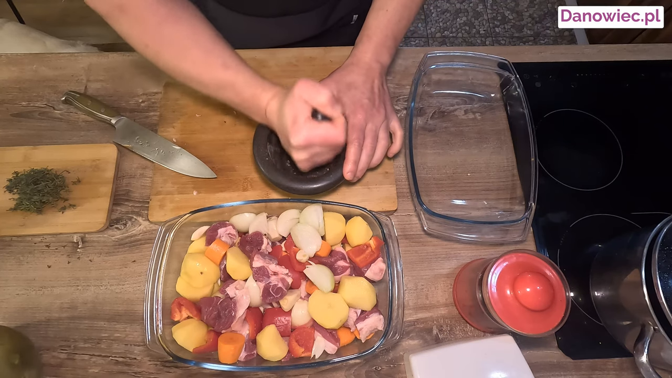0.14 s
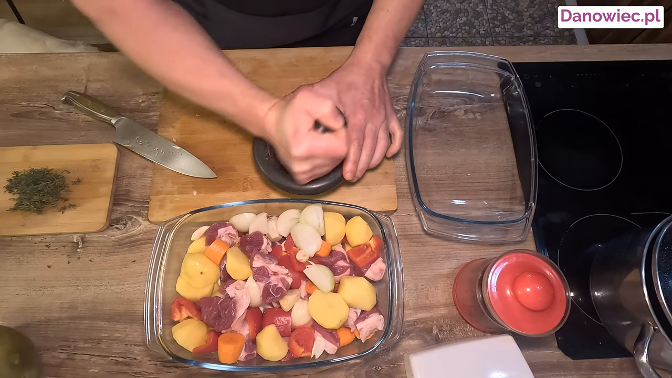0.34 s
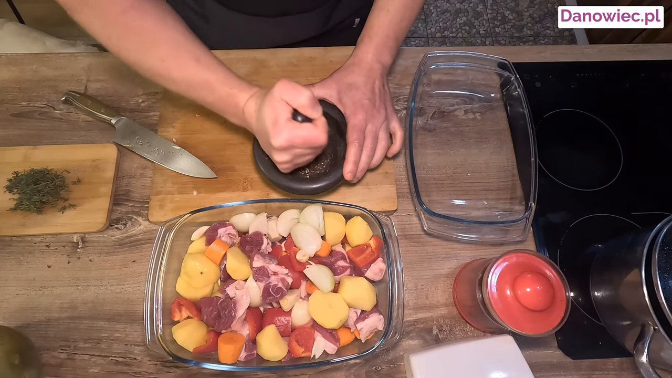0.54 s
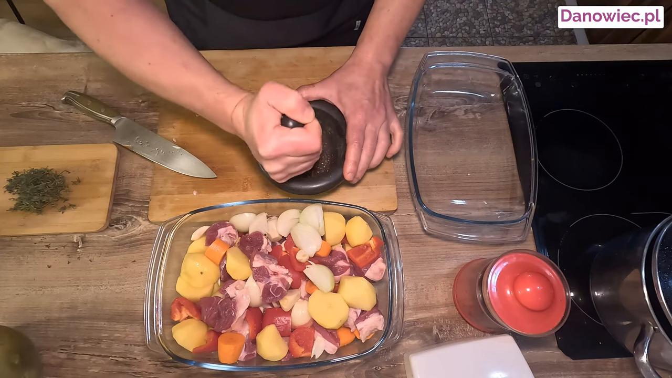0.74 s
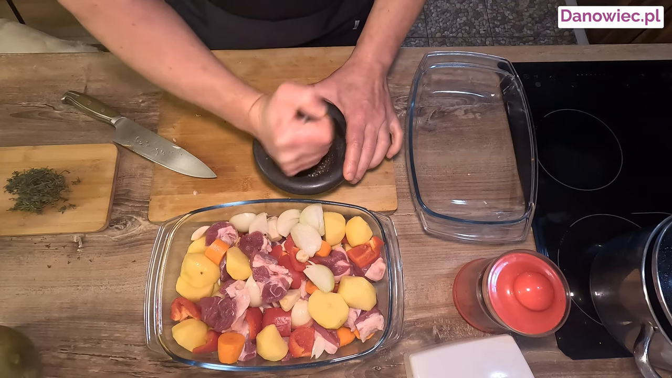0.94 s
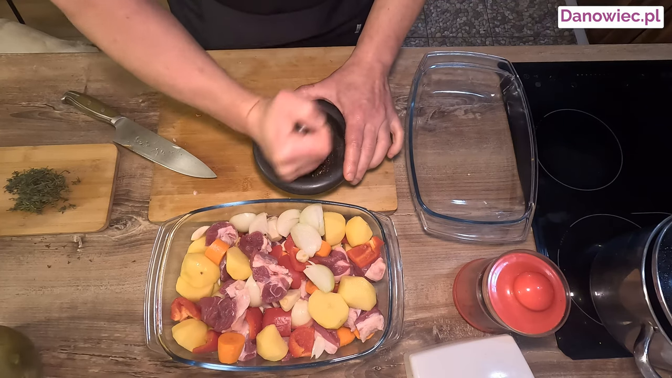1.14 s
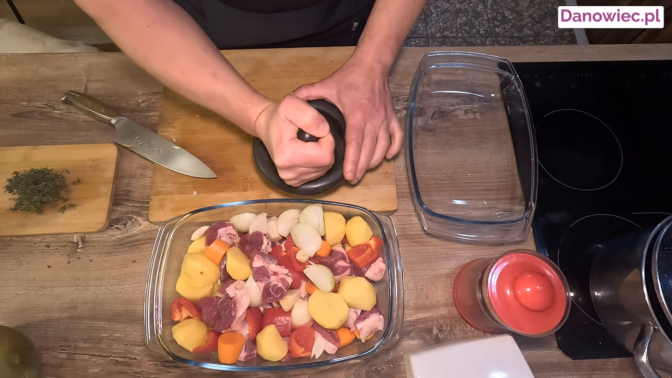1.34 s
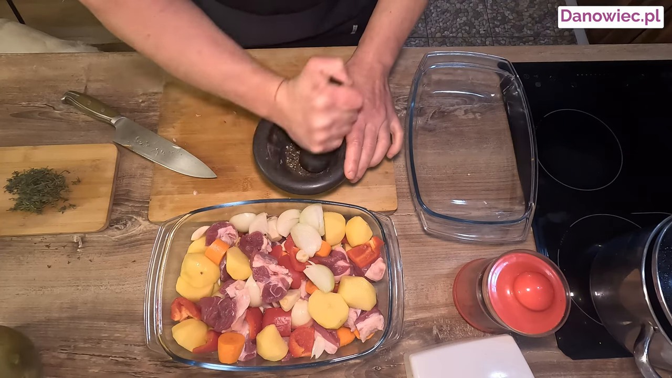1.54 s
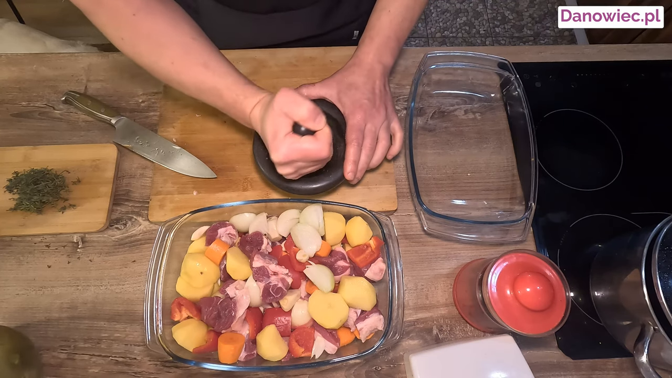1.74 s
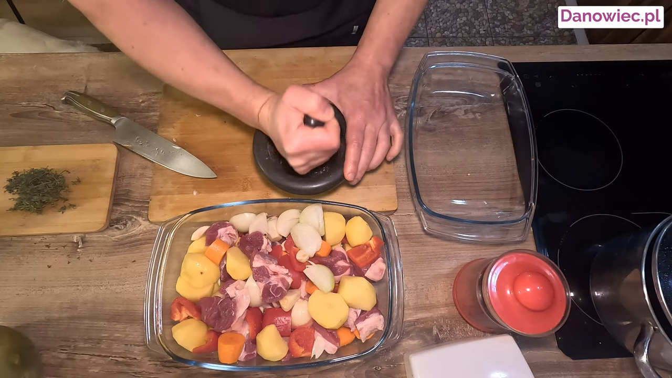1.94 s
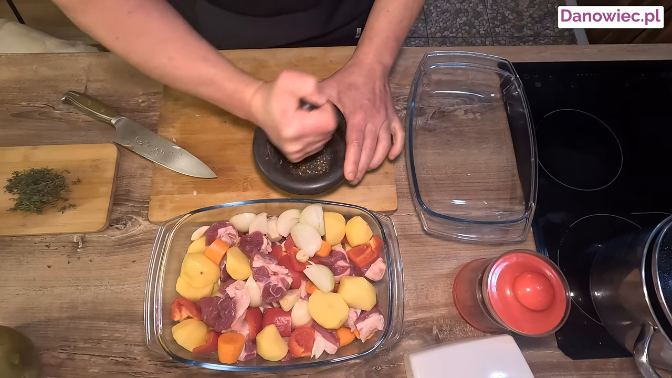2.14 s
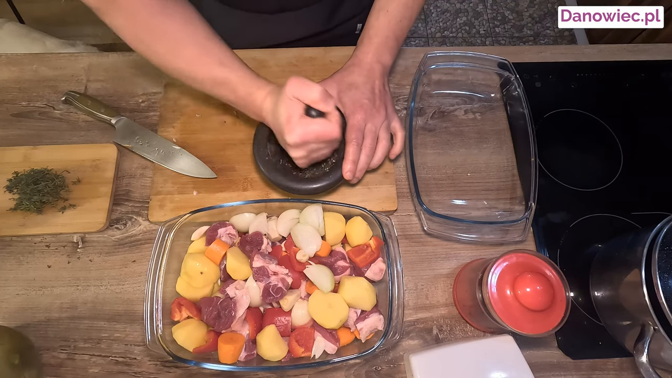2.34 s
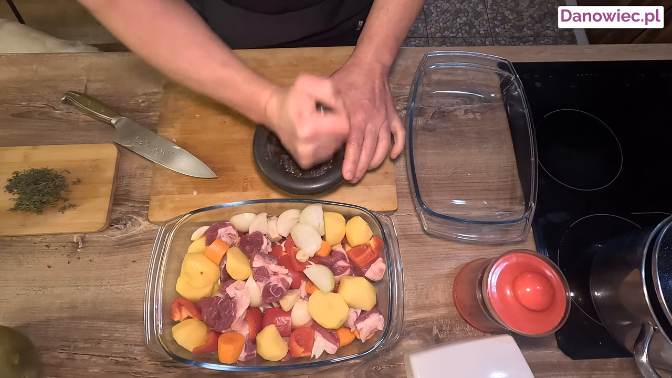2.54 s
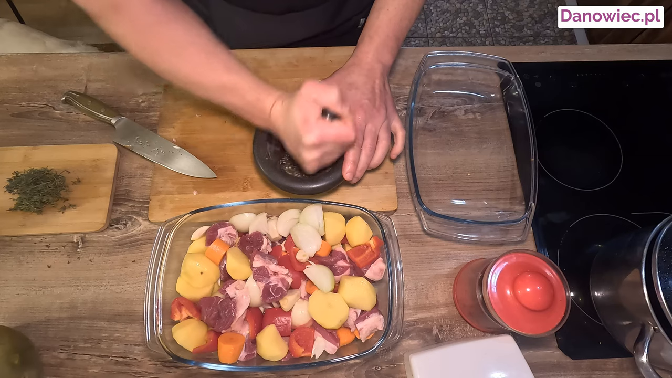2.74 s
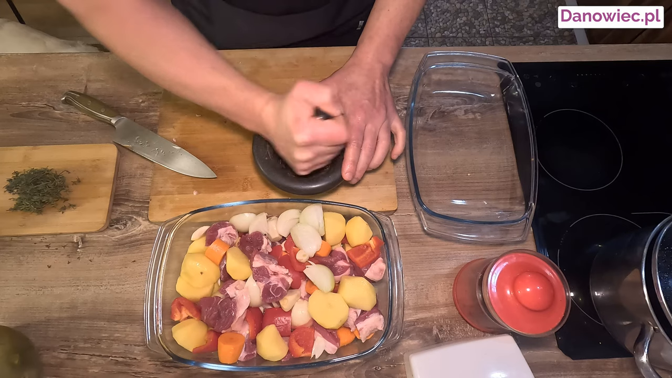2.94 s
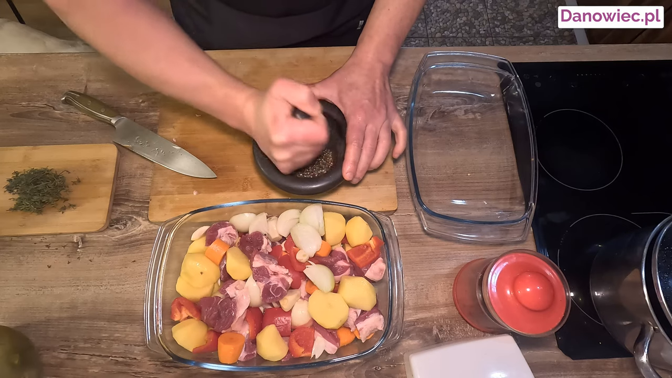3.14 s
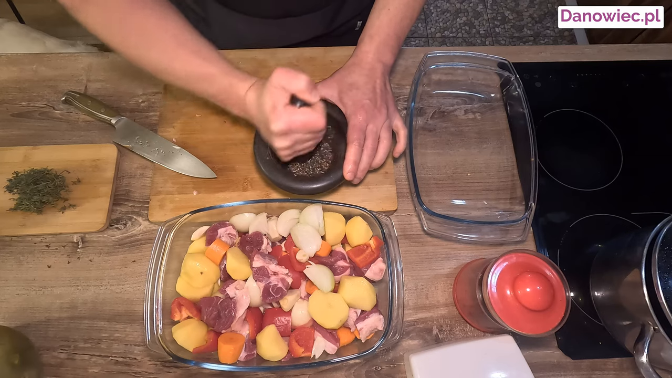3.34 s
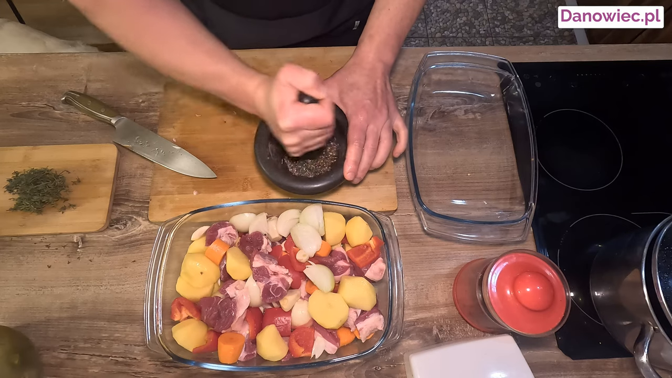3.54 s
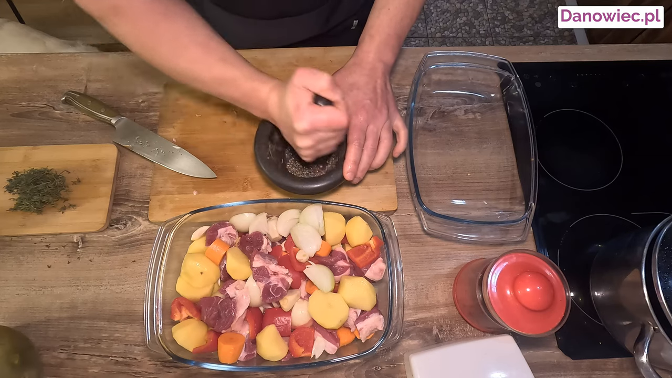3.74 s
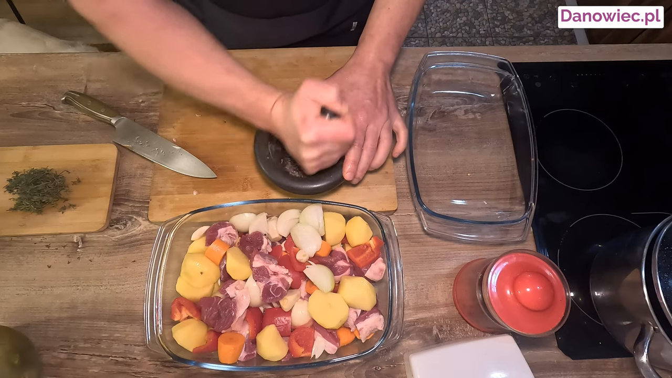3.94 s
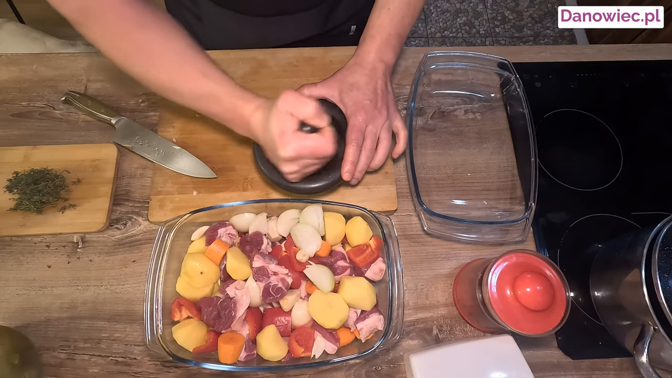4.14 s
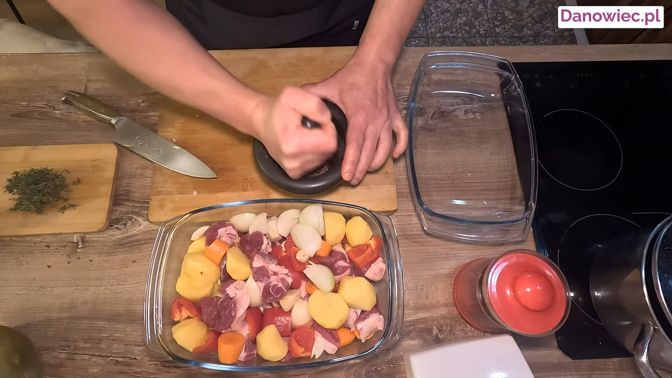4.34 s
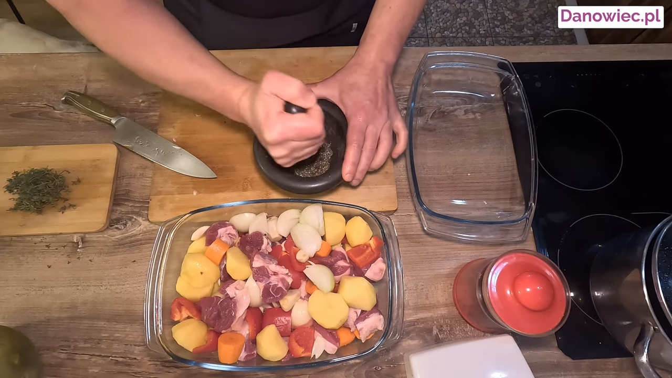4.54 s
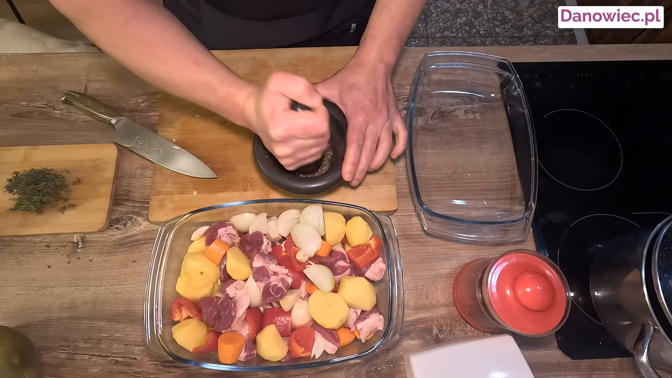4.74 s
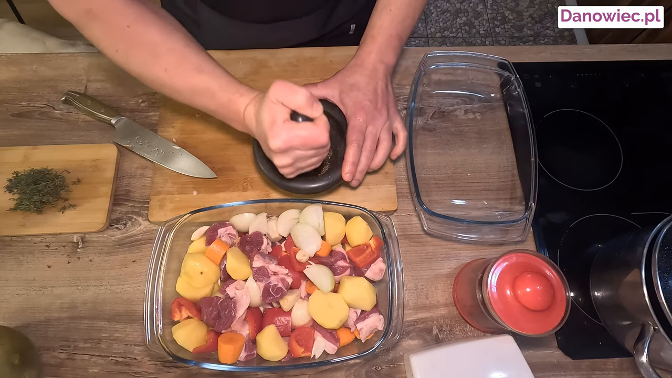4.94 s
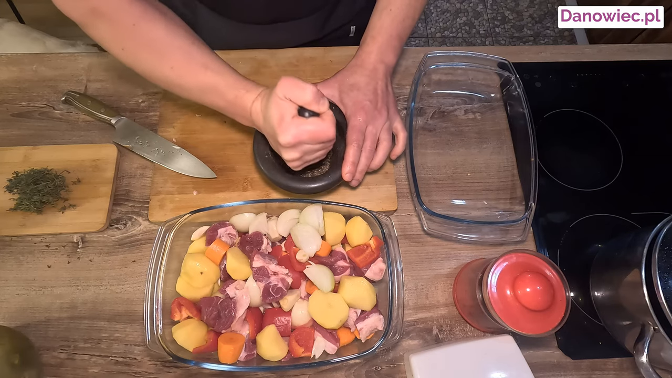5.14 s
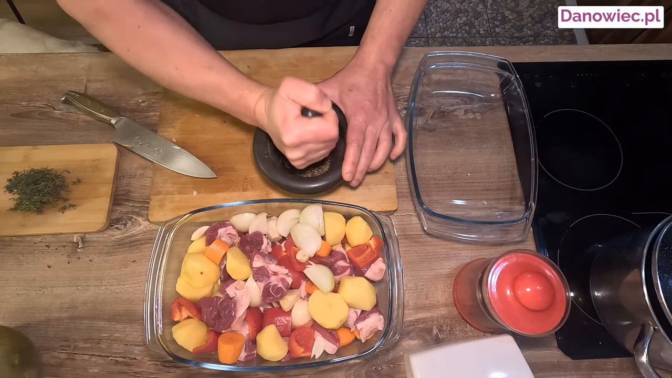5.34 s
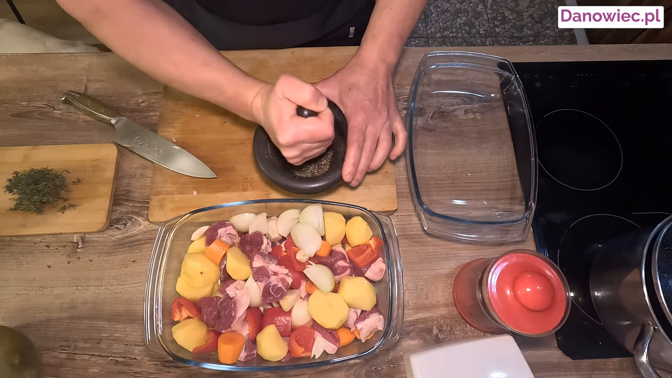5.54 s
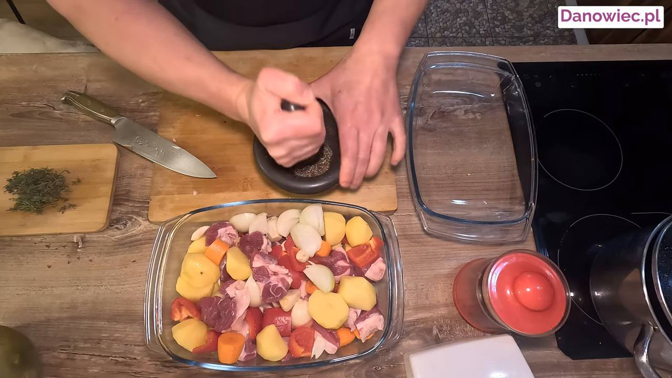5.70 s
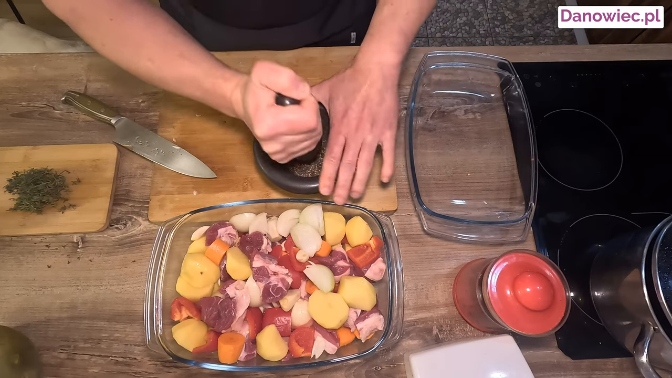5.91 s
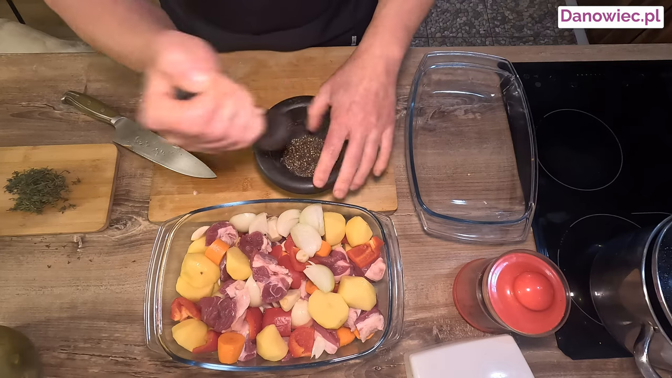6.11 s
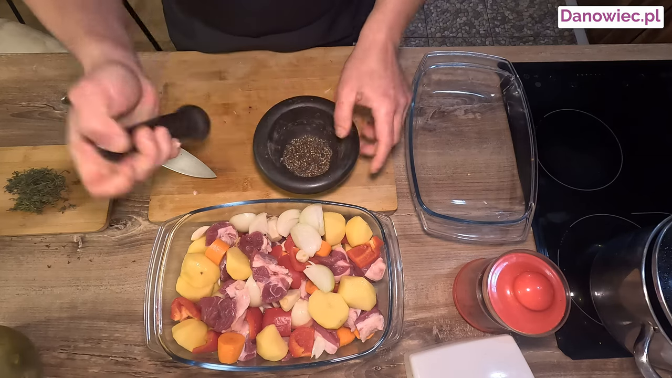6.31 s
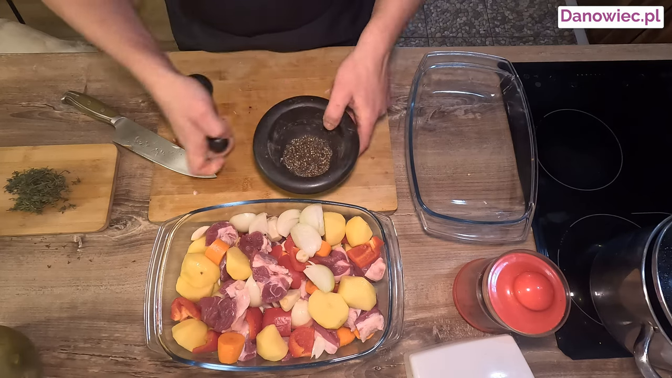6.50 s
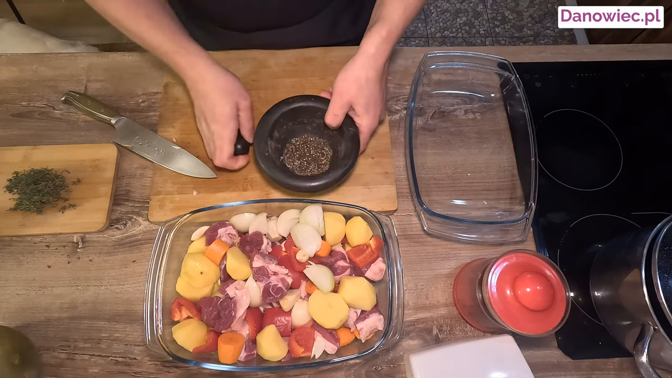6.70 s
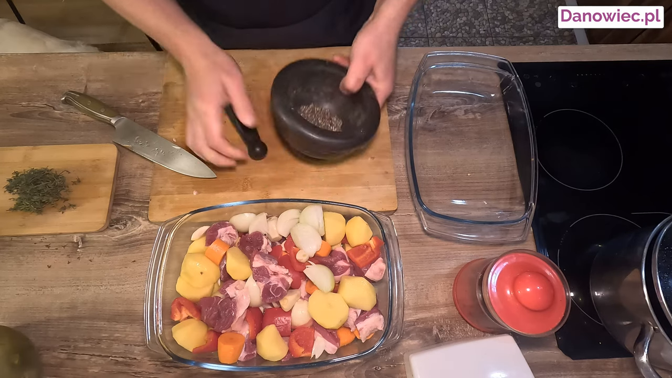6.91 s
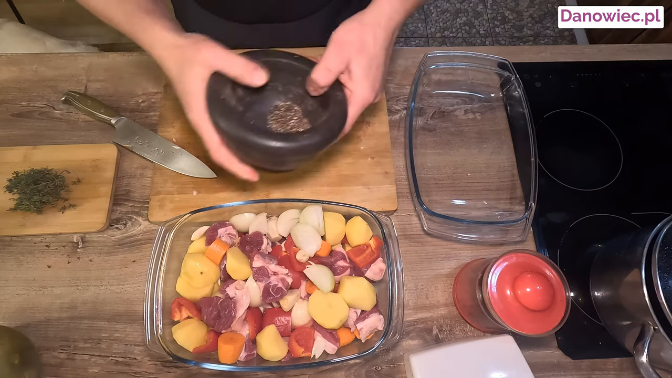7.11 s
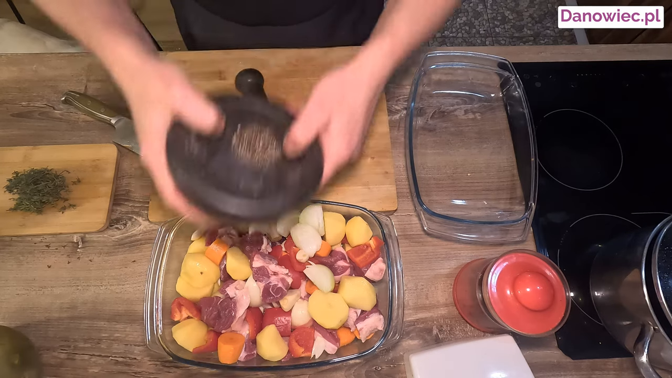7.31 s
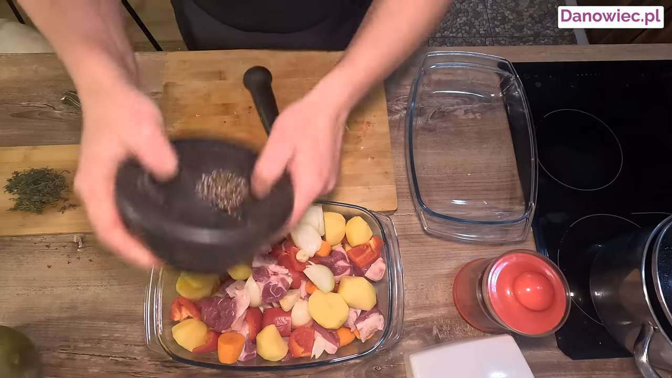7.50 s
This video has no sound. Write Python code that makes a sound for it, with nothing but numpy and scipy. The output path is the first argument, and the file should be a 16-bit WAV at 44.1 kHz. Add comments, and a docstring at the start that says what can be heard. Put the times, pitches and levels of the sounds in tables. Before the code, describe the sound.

Close to the microphone in a small, lightly echoing kitchen, a stone pestle grinds peppercorns in a stone mortar. From 0 to 0.7 seconds it rumbles over the board with gritty chatter and cracking husks. Clinks on the bare bowl ring clearly at 0.8 and 1.3 seconds, with lesser knocks at 1.0 and 1.4 and light crunches between. A dull thud lands at 2.0. From 2.2 to 4.5 seconds the grinding is dense and uneven, full of jolts, scrapes and snapping corns. Five heavy cushioned blows follow at about 4.9, 5.2, 5.4, 5.6 and 5.9, thumping the wood and slightly overloading. Small clicks and skin rustle come around 6.2 to 6.5. The pestle clacks onto the board at 6.7, again lightly at 6.8, then at 7.0. Loose pepper trickles faintly from 7.4 to the end, over quiet room air and a low drone.

```python
"""A stone pestle grinds and pounds peppercorns in a stone mortar on a wooden board in a kitchen.
Random slips, short noise bursts and single knocks shake the resonances of board, bowl and point of contact.
Corns that give way jolt the board; twice the pestle rings clearly on the bare bowl; dull blows come later.
The pestle is then laid on the board and the mortar lifted, and ground pepper trickles.
Room air, a low drone and echoes surround it all; the close microphone overloads on the hard blows."""
import sys
import numpy as np
from scipy import signal
from scipy.fft import rfft, irfft, next_fast_len
from scipy.io import wavfile
from scipy.ndimage import map_coordinates

SR = 44100
rng = np.random.default_rng(int(sys.argv[2]) if len(sys.argv) > 2 else 0)


def put_to_file(sound):
    """Save the sound as 16-bit audio at rate SR, in the file named by the first command-line argument."""
    columns = np.atleast_2d(sound).T  # one column per channel
    safe = np.clip(columns, -1, 1)
    whole_steps = np.round(safe * 32767)
    wavfile.write(sys.argv[1], SR, whole_steps.astype(np.int16))


N = 337894  # samples in the whole scene
RING = SR // 2  # samples that one contact lasts
BOARD_GRID = np.fft.rfftfreq(RING, 1 / SR)  # Hz at which the board's response is computed

# corns that give way, and a few soft rubs: (time [s], board jolt [dB], jolt pitch [Hz],
# stone chatter [dB], husk crunch [dB], time of yielding [s])
CORN_EVENTS = [(0.021, -19.5, 436, -25, -31, 0.031), (0.0631, -16.5, 540, -20.5, -39, 0.089),
               (0.088, -15, 660, -32, -33.5, 0.043), (0.189, -21.5, 488, -25, -49, 0.11),
               (0.244, -10.5, 337, -19.5, -27, 0.035), (0.277, -16.5, 342, -29, -47, 0.04),
               (0.333, -12.5, 261.5, -41, -46, 0.043), (0.3913, -11.5, 328, -20, -42, 0.046),
               (0.459, -13.5, 290, -16.5, -24, 0.053), (0.5195, -9, 324.5, -20.5, -45.5, 0.044),
               (0.558, -11, 321.8, -16.5, -32, 0.064), (0.7025, -26, 196.4, -12.5, -45.5, 0.041),
               (0.921, -31, 247.3, -48, -60, 0.054), (0.974, -32, 650, -38, -72, 0.18),
               (1.036, -19, 169, -29.5, -31.5, 0.015), (1.0628, -15.5, 520, -16.5, -23.5, 0.023),
               (1.098, -24, 800, -36.5, -29, 0.071), (1.176, -31.5, 900, -50.5, -51.5, 0.031),
               (1.26, -31.5, 296, -41, -41.5, 0.06), (1.581, -20, 695, -26, -30.5, 0.065),
               (1.6067, -18.5, 574, -20.5, -35, 0.066), (2.088, -21.5, 830, -26, -48, 0.023),
               (2.138, -23.5, 940, -36, -42, 0.074), (2.281, -13, 700, -19.5, -59, 0.079),
               (2.378, -11.5, 178.6, -16, -36.5, 0.06), (2.412, -18, 211.6, -26, -23, 0.037),
               (2.461, -13.5, 330, -24, -29, 0.026), (2.5193, -13.5, 500, -13.5, -43, 0.023),
               (2.5595, -10, 587, -15.5, -34, 0.072), (2.6375, -13, 224, -22, -32.5, 0.047),
               (2.748, -18.5, 319, -38, -50, 0.075), (2.812, -12, 390, -14, -37.5, 0.11),
               (2.8359, -9.5, 340, -13.5, -38, 0.074), (2.985, -15, 393, -21.5, -52, 0.045),
               (3.071, -11, 316, -12, -37, 0.062), (3.098, -11, 277, -12, -44, 0.02),
               (3.126, -13.5, 275, -30, -28, 0.036), (3.267, -14, 420, -36, -55, 0.11),
               (3.3224, -10.5, 377, -10, -33, 0.037), (3.3759, -11, 328, -31, -37, 0.031),
               (3.4135, -12, 454, -15.5, -38, 0.049), (3.5675, -15.5, 395, -21.5, -30, 0.037),
               (3.597, -17, 298, -27, -31, 0.065), (3.643, -12, 575, -8.5, -30, 0.04),
               (3.665, -11.5, 109, -41, -42, 0.033), (3.7986, -21, 503, -15, -47, 0.015),
               (3.929, -18.5, 406, -21.5, -32, 0.044), (3.9889, -11.5, 580, -11, -33, 0.023),
               (4.046, -10, 253, -10, -26, 0.054), (4.1574, -19.5, 660, -20.5, -36, 0.034),
               (4.2066, -11, 333, -18.5, -32.5, 0.059), (4.2945, -10.5, 453, -15.5, -38, 0.071),
               (4.3134, -9, 290, -15.5, -34, 0.065), (4.515, -17.5, 219, -36, -60, 0.054),
               (4.587, -21.5, 393, -29, -37, 0.062)]
# ways the stone bowl rings: (frequency [Hz], level [dB], time to fade by 60 dB when left free [s])
BOWL_MODES = [(2300, -16, 0.12), (2300, -29.5, 0.2), (3487, -11, 0.06), (3735, -14, 0.16), (3775, -12, 0.1),
              (3801, -4, 0.31), (3822, -15, 0.24), (3900, -21, 0.15), (5480, -34, 0.11), (6200, -31, 0.24),
              (7300, -23.5, 0.05), (9250, -30.5, 0.2)]
# colour of breaking husks: (frequency [Hz], level [dB])
HUSK_COLOUR = [(1200, -22.5), (2500, -3.5), (3600, -4), (4600, -10.5), (6000, -2), (7000, 1.5), (7600, -2),
               (8300, 3), (10300, -2.5)]
# colour of a cushioned stone knock: (frequency [Hz], level [dB])
KNOCK_COLOUR = [(60, -14.5), (160, 10), (260, 3.5), (390, 17), (465, 11.5), (560, 14), (690, 16.5),
                (1000, 7.5), (1550, -3), (2100, -12), (2500, -24.5), (3300, -18.5), (4500, -28.5),
                (10000, -61.5)]

ATTACK_S, RELEASE_S = 0.0095, 0.078  # a stroke builds up, and dies away by 60 dB
DRAG_CRUNCH_DB = -25.5  # husks under the mere weight of the pestle, relative to that weight, before mixing
CHATTER_DB, CHATTER_GROWS = -23.5, 0.89  # stone chatter at full force, and its dB per dB of force
UNEVEN_DB, UNEVEN_RATE = 2, 22  # the bed of corns is lumpy: depth, lumps a second
STALL_S, STALL_DB = 0.03, 5  # the pestle sticks before each jolt: time, loss of level
HELD_T60_S = 0.31  # extra damping of a jolt by the steadying hand: time to fade by 60 dB
SLIPS_PER_S, JOLT_WIDTH = 420, 1.4  # slips in a jolt; bandwidth of the jolt as a share of its pitch
JOLT_S = 0.03  # the opening stretch over which a jolt's level is set
RASP_FADES = 5  # the chatter's fading time is the time of yielding over this
SKID_S, BUZZ_HZ = 0.0046, (1604, 2047)  # fading time of a skid and the band it buzzes in
SCRATCH_DB, FLARE_DB = -17, -23.5  # scratch relative to the buzz; the bowl's answer to a skid
PRESSED_T60_S = 0.16  # extra damping of the bowl by the pressing pestle: time to fade by 60 dB
LIGHT_HZ = 57  # below this the pestle alone barely moves the board
CHOKE_S = 0.035  # time in which the touching pestle reaches its full choke
SLAP_HZ = 1540  # the first hard instant of a cushioned blow
DRONE_DB = -7.5  # the appliance, relative to the room air
EARLY_DB, EARLY_S = 4.5, 0.0096  # worktop and cupboards answer early: extra level, fading time
TOP_HZ = 10350  # upper limit of the sound


def amp(db):
    """Turn decibels into gain."""
    return 10 ** (np.asarray(db) / 20)


def unit(x):
    """Scale to an average (rms) level of 1."""
    return x / np.sqrt(np.mean(x ** 2) + 1e-20)


def peaked(x):
    """Scale to peak 1."""
    return x / np.max(np.abs(x))


def along(points, hz):
    """Read a curve of (Hz, value) points along a logarithmic frequency axis."""
    f, v = np.transpose(points)
    return np.interp(np.log(hz + 1), np.log(f + 1), v)


def curves(rows):
    """Give one value per sample for each column after the time."""
    s, *cols = np.transpose(rows)
    return [np.interp(np.arange(N) / SR, s, c) for c in cols]


def wobble(rate):
    """Draw a smooth random curve with rate knots a second."""
    knots = rng.standard_normal(int(N * rate / SR) + 4)
    return map_coordinates(knots, [np.arange(N) * rate / SR])


def filtered(x, response):
    """Shape x with a complex response that depends on frequency."""
    m = next_fast_len(len(x) + min(len(x), RING))
    return irfft(rfft(x, m) * response(np.fft.rfftfreq(m, 1 / SR)), m)[:len(x)]


def coloured(x, points):
    """Shape x with a curve of (Hz, dB) points."""
    return filtered(x, lambda hz: amp(along(points, hz)))


def resonance(hz, centre, width):
    """Response of one damped mode: it favours its own pitch and only sounds after the push."""
    return 1j * hz * width / (centre ** 2 - hz ** 2 + 1j * hz * width)


def add(track, s, x):
    """Mix x into the track at time s."""
    part = track[max(round(s * SR), 0):][:len(x)]
    part += x[:len(part)]


def burst(t60):
    """Noise that dies away by 60 dB in t60 seconds."""
    return rng.standard_normal(RING) * amp(-60 * np.arange(RING) / SR / t60)


def grains(rate, spread_db):
    """Random tiny clicks of very unequal size, rate a second on average."""
    size = amp(spread_db * np.clip(rng.standard_normal(N), -2, 2))
    happens = rng.random(N) < rate / SR
    return happens * size * rng.choice([-1, 1], N)


def swells(rows, attack_s, release_s):
    """Gain of (start, length, dB) gestures: each rises, holds and dies away by 60 dB in release_s."""
    t = np.arange(N) / SR
    shapes = []
    for s, length, db in rows:
        rise = np.clip((t - s) / attack_s, 0, 1)
        fade_db = -60 * np.maximum(t - s - length, 0) / release_s
        shapes.append(rise * amp(db + fade_db))
    return np.linalg.norm(shapes, axis=0)


def board_modes():
    """The loaded board and worktop sway in many damped modes; each row is the response of one."""
    # (frequency [Hz], width [Hz], level [dB])
    wood_modes = [(57.3, 9.8, 11), (78, 25, -21.5), (101.3, 23, 4), (137, 23, -3), (157.4, 22, 5),
                  (158, 66, -1.5), (224.8, 23.6, 2.5), (314, 56.4, 1.5), (388, 43, 4), (525.8, 11, 2),
                  (600, 34, -6.5), (660, 22, -1), (720, 36, -8), (771, 16, -6), (901, 40, -11.5),
                  (980.5, 96, -7.5), (1166, 77, -10), (1358, 190, -18), (1460, 90, -23), (2080, 140, -20.5),
                  (3300, 920, -36)]
    rows = []
    for k, (centre, width, db) in enumerate(wood_modes):
        sign = (-1) ** (k // 2)
        rows.append(sign * amp(db) * resonance(BOARD_GRID, centre, width))
    return np.array(rows)


def thump(board, hard_hz, scatter_db):
    """Each point of contact drives the modes differently; a soft contact leaves the upper ones still."""
    shares = amp(scatter_db * rng.standard_normal((len(board), 1)))
    softness = (1 + 1j * BOARD_GRID / (2 * hard_hz)) ** 2
    return peaked(irfft((shares * board).sum(axis=0) / softness, RING))


def light(board):
    """Without the weight of the arm, the pestle hardly stirs the deepest modes of the worktop."""
    return board * (1j * BOARD_GRID / (LIGHT_HZ + 1j * BOARD_GRID)) ** 2


def ringing(modes, size=RING):
    """A stone body rings as a sum of fading sines, with slightly different levels at every touch."""
    t = np.arange(size) / SR
    ring = np.zeros(size)
    for hz, db, t60 in modes:
        level_db = db + rng.normal(0, 1) - 60 * t / t60
        ring += amp(level_db) * np.sin(2 * np.pi * hz * t)
    return ring


def contact(x, centre_hz, width_hz):
    """The pestle bounces on the stiffness of its point of contact; little passes far from that pitch."""
    def bounce(hz):
        return resonance(hz, centre_hz, width_hz) * resonance(hz, centre_hz, .6 * centre_hz) ** 2
    return filtered(x, bounce)


def clack(centre_hz, width_hz, grit_db, grit_t60):
    """One hard contact makes a bounce and a short gritty crack."""
    # (frequency [Hz], level [dB])
    grit_colour = [(300, -13), (1000, 26.5), (2200, 20.5), (2700, -4.5), (3200, 4.5), (4500, -3),
                   (5500, -12.5), (7000, -23), (10000, -42.5)]
    bounce = peaked(contact(signal.unit_impulse(RING), centre_hz, width_hz))
    grit = peaked(coloured(burst(grit_t60), grit_colour))
    return bounce + amp(grit_db) * grit


def crunch(t60):
    """A husk shatters in a quick run of snaps, each a spray of splinters."""
    t = np.arange(RING) / SR
    snaps = (rng.random(RING) < 500 / SR) * rng.exponential(size=RING)
    snaps[0] = 2  # the first snap is always there
    bursts = np.abs(signal.fftconvolve(snaps, np.exp(-t / .0006))[:RING])
    spray = rng.standard_normal(RING) * (.2 + bursts)
    return unit(coloured(spray, HUSK_COLOUR)) * amp(-60 * t / t60)


def skidding(x):
    """Stone skids on stone: a buzz in a narrow band with steep edges, and a thin scratch above it."""
    buzz = signal.sosfilt(signal.butter(3, BUZZ_HZ, "bandpass", fs=SR, output="sos"), x)
    scratch = filtered(x, lambda hz: resonance(hz, 2800, 1400) ** 2)
    return unit(buzz) + amp(SCRATCH_DB) * unit(scratch)


def skid(length):
    """One short skid on the bare bowl, which flares up in sympathy; peak 1."""
    t = np.arange(RING // 4) / SR
    rasp = rng.standard_normal(len(t)) * np.exp(-(t / length) ** 2)
    damped_bowl = ringing(BOWL_MODES, size=len(t)) * amp(-60 * t / PRESSED_T60_S)
    ring = signal.fftconvolve(rasp, damped_bowl)[:len(t)]
    return peaked(skidding(rasp) + amp(FLARE_DB) * unit(ring))


def stalls():
    """Gain that sinks while the pestle sticks and returns as it jolts free."""
    t = np.arange(N) / SR
    stuck = np.zeros(N)
    for s, *_ in CORN_EVENTS:
        corners = [s - STALL_S, s - STALL_S / 2, s, s + STALL_S / 10]
        stuck += np.interp(t, corners, [0, 1, 1, 0])
    return amp(-STALL_DB * np.minimum(stuck, 1))


def effort():
    """Force on the corns and the crunch of their husks: the pestle's weight plus the strokes of the arm."""
    # the pestle circles without leaving the corns: (start [s], length [s], weight [dB])
    circling = [(-0.05, 0.76, -16), (1.02, 0.26, -33.5), (1.55, 0.25, -35), (2.02, 0.2, -30),
                (2.26, 2.24, -18.5), (4.56, 0.081, -29)]
    # the arm leans in: (start [s], length [s], force [dB], husk crunch [dB])
    arm_strokes = [(0.03, 0.33, -33, -40), (0.207, 0.35, -23.5, -41.5), (0.437, 0.11, -24, -36.5),
                   (1.002, 0.087, -21.5, -44), (1.594, 0.043, -22.5, -42.5), (2.063, 0.084, -20, -42),
                   (2.244, 0.073, -14, -37.5), (2.356, 0.11, -14.5, -29), (2.488, 0.085, -12.5, -35.5),
                   (2.69, 0.066, -13.5, -64), (2.776, 0.054, -13.5, -36.5), (3.033, 0.094, -14, -31.5),
                   (3.296, 0.11, -18.5, -32), (3.537, 0.13, -18, -30), (3.7, 0.24, -15.5, -38.5),
                   (3.907, 0.058, -10.5, -29.5), (4.177, 0.15, -18, -39), (4.415, 0.098, -17, -41.5)]
    start, length, force_db, crunch_db = np.transpose(arm_strokes)
    weight = swells(circling, ATTACK_S, RELEASE_S)
    arm_force = swells(zip(start, length, force_db), ATTACK_S, RELEASE_S)
    arm_crunch = swells(zip(start, length, crunch_db), ATTACK_S, RELEASE_S)
    force = np.hypot(weight, arm_force)
    husks = np.hypot(amp(DRAG_CRUNCH_DB) * weight, arm_crunch)
    lumps = amp(UNEVEN_DB * wobble(UNEVEN_RATE)) * stalls()
    return force * lumps, husks * lumps


def grinding(board):
    """The pestle rolls over the corns: slips jolt the board, rattle the stone and splinter husks."""
    # colour of the rumble: (frequency [Hz], level [dB])
    slip_colour = [(35, -0.5), (60, 5), (100, -6.5), (150, -3), (230, -8), (320, 1.5), (400, 1.5),
                   (540, -1.5), (700, 2), (1100, -2), (1500, -5), (3000, -21.5)]
    force, crunch_gain = effort()
    slips = grains(rate=650, spread_db=2) * amp(2 * wobble(45))
    # the pressing hand damps the board
    pressed = amp(-60 * np.arange(RING) / SR / 0.3)
    # the point of contact wanders round the bowl, so the colour of the rumble keeps shifting
    shares = amp(8 * np.array([wobble(25) for _ in range(5)]))
    shares = shares / np.linalg.norm(shares, axis=0)
    rumble = np.zeros(N)
    for share in shares:
        spot = pressed * thump(board, hard_hz=1130, scatter_db=3.5)
        rumble += signal.oaconvolve(slips * share, spot)[:N]
    rumble = unit(coloured(rumble, slip_colour))
    # riding over whole corns adds slow, soft lurches
    bumps = grains(rate=70, spread_db=4) * amp(4 * wobble(14))
    lurch = unit(filtered(bumps, lambda hz: resonance(hz, 185, 210) ** 3))
    rattle = (slips + grains(rate=2500, spread_db=2)) * amp(4.5 * wobble(110))
    chatter = unit(skidding(rattle))
    snaps = grains(rate=2000, spread_db=4) * amp(4 * wobble(90))
    splinters = unit(coloured(snaps, HUSK_COLOUR))
    # the bowl rings mostly in the moments when bare stone touches
    touches = rattle * amp(7 * wobble(14))
    ring = unit(signal.fftconvolve(touches, ringing(BOWL_MODES) * pressed ** 4)[:N])
    stone = amp(CHATTER_DB) * force ** CHATTER_GROWS * (chatter + amp(-23) * ring)
    wood = force * (amp(-3.5) * rumble + amp(-12) * lurch)
    return wood + stone + amp(-1.5) * crunch_gain * splinters


def background():
    """Room air is coloured noise with a slow level curve and slight random unevenness, plus a low drone."""
    # level of air and drone: (time [s], level [dB])
    room_level = [(0, -39), (4.8, -34), (5.1, -52.5), (6.1, -43), (6.5, -37.5), (7.25, -45.5),
                  (7.66, -35.5)]
    # (frequency [Hz], level [dB])
    air_colour = [(15, -54), (25, -16.5), (75, -7.5), (107, -6.5), (190, -18.5), (494, -27), (574, -28.5),
                  (1860, -37), (2110, -40), (10000, -54.5), (13000, -72.5), (22000, -120)]
    level_db, = curves(room_level)
    air = unit(coloured(rng.standard_normal(N), air_colour))
    # an appliance's drone is noise through a low resonance
    drone = unit(filtered(rng.standard_normal(N), lambda hz: resonance(hz, 106, 28) ** 2))
    return amp(level_db) * (amp(1.5 * wobble(8.6)) * air + amp(DRONE_DB) * drone)


def jolt(board, pitch_hz, yielding):
    """A run of slips shakes the board around one pitch; rms 1 over its first JOLT_S."""
    t = np.arange(RING) / SR
    slips = (rng.random(RING) < SLIPS_PER_S / SR) * rng.standard_normal(RING)
    slips *= np.exp(-(2 * t / yielding) ** 2)
    slips[0] = 2.2  # the first slip is always there
    held_board = thump(board, hard_hz=1121, scatter_db=3.0) * amp(-60 * t / HELD_T60_S)
    shake = signal.fftconvolve(slips, held_board)[:RING]
    shake = filtered(shake, lambda hz: resonance(hz, pitch_hz, JOLT_WIDTH * pitch_hz))
    return shake / np.std(shake[t < JOLT_S])


def cracks(board):
    """Corns that give way, and a few soft rubs: a run of slips jolts the board, with chatter and crunch."""
    out = np.zeros(N)
    for s, jolt_db, pitch_hz, chatter_db, crunch_db, yielding in CORN_EVENTS:
        add(out, s, amp(jolt_db) * jolt(board, pitch_hz, yielding))
        add(out, s, amp(chatter_db) * skid(yielding / RASP_FADES))
        add(out, s, amp(crunch_db) * crunch(yielding))
    return out


def skids():
    """Between the corns the pestle briefly catches and skids on the bare stone."""
    # (time [s], level [dB])
    bare_catches = [(0.177, -21), (0.2326, -26), (0.3732, -24), (0.4098, -17), (2.4892, -23), (2.685, -35),
                    (2.7311, -32), (2.8227, -18), (2.97, -23), (3.0414, -21), (3.3068, -19), (3.3514, -18),
                    (3.4388, -20), (3.8436, -36), (3.895, -25), (4.2347, -26), (4.2826, -24), (4.345, -22),
                    (4.4043, -29)]
    out = np.zeros(N)
    for s, db in bare_catches:
        add(out, s, amp(db) * skid(SKID_S))
    return out


def clinks(board):
    """The pestle hits the bare wall of the bowl, stays there and increasingly chokes its ring."""
    # (time [s], clack [dB], clack pitch [Hz], clack width [Hz], bowl ring [dB], ring choked by [dB],
    # thump [dB])
    bare_hits = [(0.8307, 2.5, 1850, 620, 0.5, 12.5, -8), (1.004, -7, 1800, 597, -33, 15, -6.5),
                 (1.3206, 6, 2036, 460, -6.5, 15, -2), (1.43, -2.5, 1880, 550, -27, 9, -8.5)]
    out = np.zeros(N)
    touching = np.minimum(np.arange(RING) / SR / CHOKE_S, 1)
    for s, clack_db, clack_hz, width_hz, ring_db, choke_db, thump_db in bare_hits:
        knock = peaked(coloured(burst(t60=0.06), KNOCK_COLOUR))
        body = thump(light(board), hard_hz=1300, scatter_db=2.0) + amp(-6.5) * knock
        add(out, s, amp(clack_db) * clack(clack_hz, width_hz, grit_db=-6, grit_t60=0.045))
        add(out, s, amp(ring_db - choke_db * touching) * ringing(BOWL_MODES))
        add(out, s, amp(thump_db) * body)
    return out


def pounding(board):
    """Pepper cushions the blows, so the board thumps under a short slap and the bowl stays still."""
    # blows and light nudges: (time [s], thump [dB], hardness [Hz], knock [dB], slap [dB], crunch [dB])
    soft_blows = [(1.846, -21, 92.5, -39.5, -37, -51), (1.891, -38, 900, -42, -30, -56),
                  (1.9842, 1.5, 452, -0.5, -23, -23), (4.667, -60, 894, -40, -29.5, -39),
                  (4.912, 5, 1090, 1.5, -4, -47), (5.169, -2.5, 197, -10, -18, -29),
                  (5.402, 3.5, 700, -4, -21, -35.5), (5.6436, 4, 660, -4, -31, -44),
                  (5.9157, 4.5, 570, -8.5, -23, -39.5), (7.372, -32, 697, -44, -43.5, -46)]
    out = np.zeros(N)
    for s, db, hard_hz, knock_db, slap_db, crunch_db in soft_blows:
        knock = peaked(coloured(burst(t60=0.097), KNOCK_COLOUR))
        slap = clack(SLAP_HZ, width_hz=600, grit_db=-2, grit_t60=0.02)
        add(out, s, amp(db) * thump(board, hard_hz, scatter_db=3.0))
        add(out, s, amp(knock_db) * knock + amp(slap_db) * slap)
        add(out, s, amp(crunch_db) * crunch(t60=0.018))
    return out


def ticks():
    """Stray bits of husk snap and fingertips catch on the stone: tiny noise bursts at one pitch each."""
    # (time [s], level [dB], pitch [Hz])
    small_clicks = [(4.6483, -25.5, 3370), (4.707, -33, 3530), (4.77, -46, 3500), (5.556, -43, 5030),
                    (5.8506, -47, 5000), (6.2114, -31, 2190), (6.244, -27, 1680), (6.2705, -35.5, 2600),
                    (6.525, -30, 2580)]
    out = np.zeros(N)
    for s, db, centre_hz in small_clicks:
        click = filtered(burst(t60=0.0046), lambda hz: resonance(hz, centre_hz, 1.05 * centre_hz) ** 2)
        add(out, s, amp(db) * peaked(click))
    return out


def hands():
    """Dry skin sticks and slips on stone and wood as the grip changes, in a dense rush of tiny clicks."""
    # (start [s], length [s], level [dB])
    grip_slides = [(6.23, 0.12, -39.5), (6.4, 0.26, -60), (7.39, 0.09, -53.5), (7.57, 0.095, -50.5)]
    # (frequency [Hz], level [dB])
    skin_colour = [(180, -27.5), (300, 0.5), (598, 7.5), (734, 3.5), (1880, 3), (7140, -14), (9290, -22),
                   (10000, -99), (13000, -120), (22000, -120)]
    rub = swells(grip_slides, attack_s=0.0088, release_s=0.088)
    catching = amp(3.5 * wobble(170))
    return rub * unit(catching * coloured(grains(rate=37000, spread_db=2.5), skin_colour))


def landings(board):
    """The stone pestle lands on the wood with head and handle: a clack, a thump, a snap and a thin ring."""
    # (time [s], clack [dB], clack pitch [Hz], thump [dB], wood knock [dB], snap [dB])
    touchdowns = [(6.7365, 4, 1307, 3.5, -1.5, -12), (6.792, -5, 1290, -2.5, -9, -31.5),
                  (6.9739, 1.5, 1173, -2.5, -13.5, -33.5)]
    # (frequency [Hz], level [dB], time to fade by 60 dB [s])
    pestle_modes = [(1840, -12, 0.18), (2144, -9.5, 0.08), (4680, -34, 0.04), (4900, -29, 0.043),
                    (5370, -36, 0.048), (6200, -35.5, 0.11)]
    out = np.zeros(N)
    for s, clack_db, clack_hz, thump_db, knock_db, snap_db in touchdowns:
        add(out, s, amp(clack_db) * clack(clack_hz, width_hz=135, grit_db=-3, grit_t60=0.085))
        add(out, s, amp(thump_db) * thump(light(board), hard_hz=544, scatter_db=1.5))
        add(out, s, amp(knock_db) * peaked(coloured(burst(t60=0.057), KNOCK_COLOUR)))
        # the bright snap of stone on hard wood, and the pestle's own thin ring
        snap = peaked(contact(burst(t60=0.025), centre_hz=3700, width_hz=2000))
        add(out, s, amp(snap_db) * snap)
        add(out, s, amp(clack_db - 14.0) * ringing(pestle_modes))
    return out


def tilting():
    """As the bowl tilts, loose pepper trickles over the stone in tiny clicks and faintly rings it."""
    # (start [s], length [s], level [dB])
    pepper_slides = [(7.41, 0.078, -52.5), (7.56, 0.066, -44)]
    flow = swells(pepper_slides, attack_s=0.078, release_s=0.42)
    bits = grains(rate=1300, spread_db=2.0)
    ring = unit(signal.fftconvolve(bits, ringing(BOWL_MODES))[:N])
    return flow * (unit(coloured(bits, HUSK_COLOUR)) + amp(-11.5) * ring)


def kitchen(x):
    """The walls' answer builds up in milliseconds; each overlapping piece of sound gets a new random tail."""
    # (frequency [Hz], time to fade by 60 dB [s])
    room_fade = [(60, 0.45), (200, 0.37), (600, 0.45), (1500, 0.37), (3800, 0.25), (6000, 0.26),
                 (10000, 0.15)]
    # (frequency [Hz], level returned [dB])
    wall_colour = [(40, 6), (90, 9), (160, 0), (420, 0.5), (1000, 0), (1900, -4.5), (3800, 1.5), (10000, 2)]
    hop = SR // 5
    out = np.zeros(N)
    padded = np.pad(x, (hop, 2 * hop))
    for start in range(0, N + hop, hop):
        hz, t, z = signal.stft(rng.standard_normal(RING), SR, nperseg=256)
        fade = amp(-60 * t / along(room_fade, hz)[:, None])
        tail = signal.istft(z * fade, SR, nperseg=256)[1]
        age = np.arange(len(tail)) / SR
        build_up = 1 - np.exp(-age / 0.0039)
        early = 1 + amp(EARLY_DB) * np.exp(-age / EARLY_S)
        tail = tail * build_up * early
        piece = padded[start:start + 2 * hop] * np.hanning(2 * hop)
        answer = signal.fftconvolve(piece, tail / np.linalg.norm(tail))
        add(out, max(start - hop, 0) / SR, answer[max(hop - start, 0):])
    return coloured(out, wall_colour)


def scene():
    """Everything sounds from the middle; a faint diffuse side layer, strongest in the treble, widens it."""
    # (frequency [Hz], side level [dB])
    side_colour = [(250, -41.5), (1000, -28.5), (2500, -14), (5000, -12), (10000, -12.5)]
    board = board_modes()
    milling = grinding(board) + cracks(board) + skids() + ticks() + hands() + tilting()
    blows = clinks(board) + pounding(board) + landings(board)
    air = background()
    mid = blows + milling + kitchen(amp(-9.5) * blows + amp(-6) * milling) + air
    side = coloured(kitchen(milling + amp(-11.5) * blows + air), side_colour)
    return np.array([mid + side, mid - side])


def record(dry):
    """The input bends over near full scale; a steep filter removes what lies above the band limit."""
    clipped = dry / (1 + np.abs(dry / .9) ** 8) ** (1 / 8)
    low_pass = signal.ellip(12, .05, 110, TOP_HZ, fs=SR, output="sos")
    return signal.sosfilt(low_pass, clipped)


dry = scene()
out = record(dry)
put_to_file(out)
```